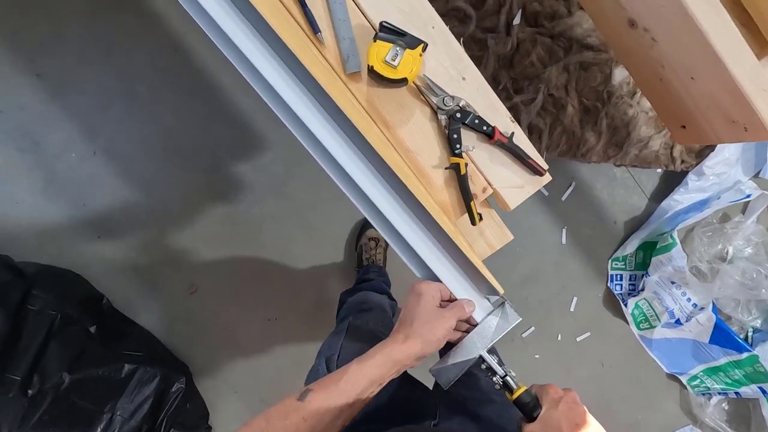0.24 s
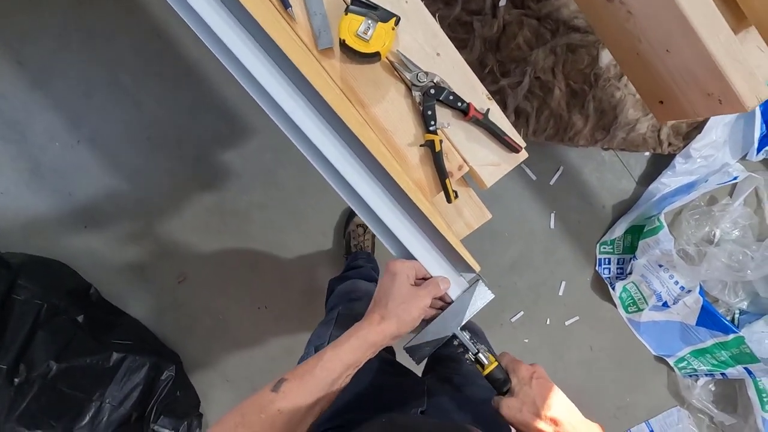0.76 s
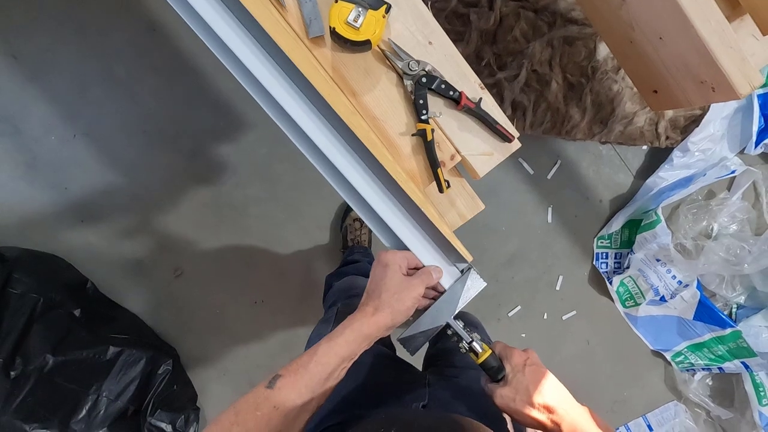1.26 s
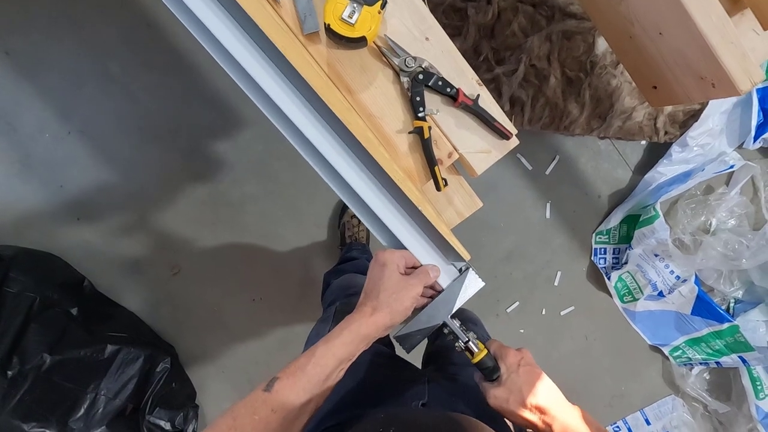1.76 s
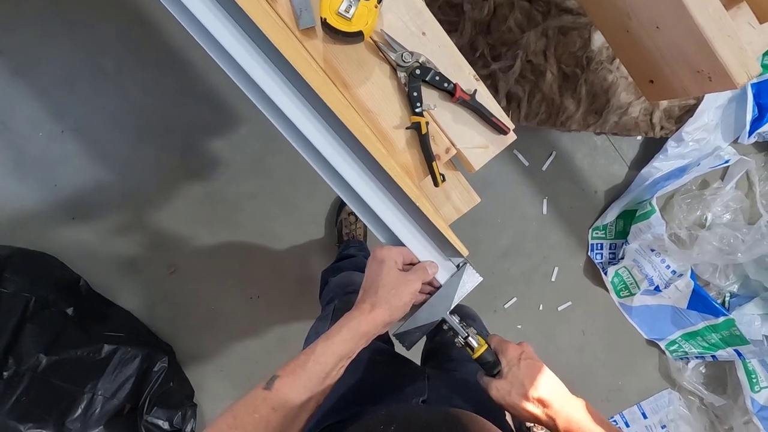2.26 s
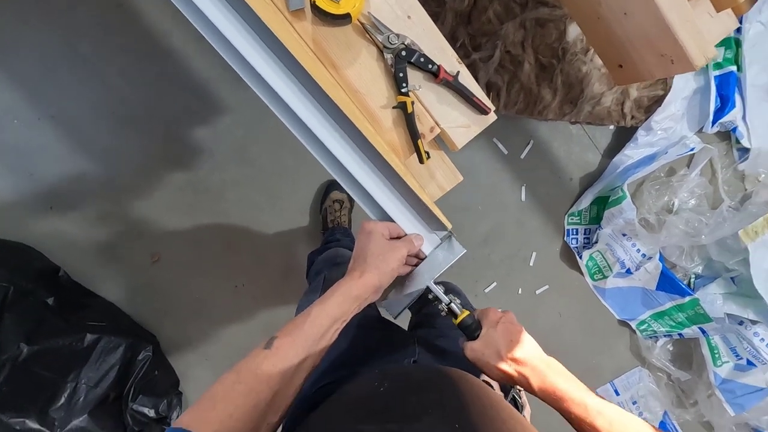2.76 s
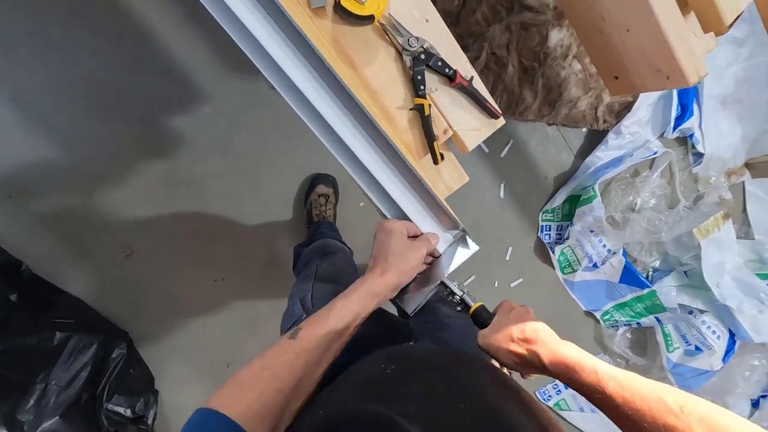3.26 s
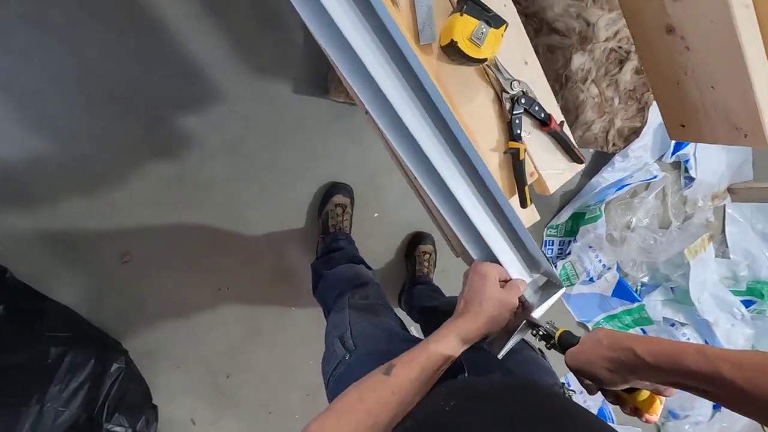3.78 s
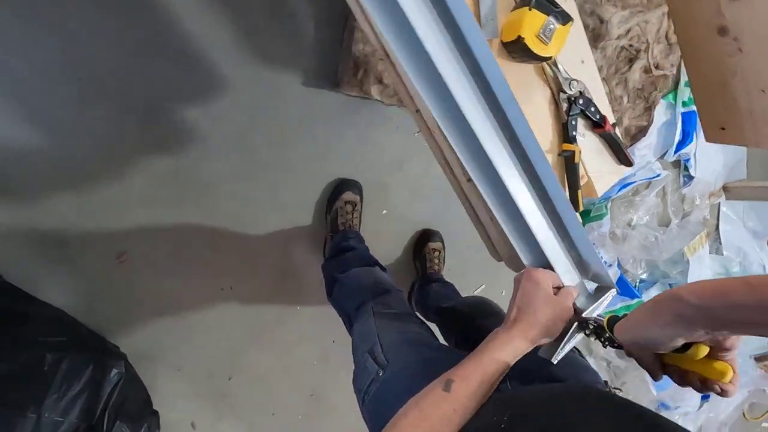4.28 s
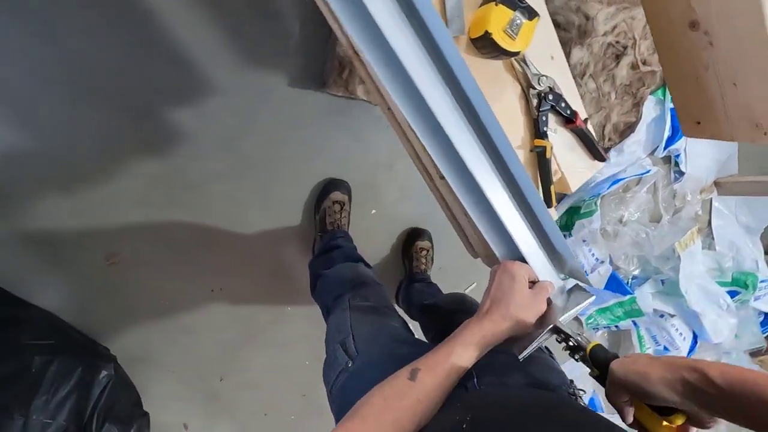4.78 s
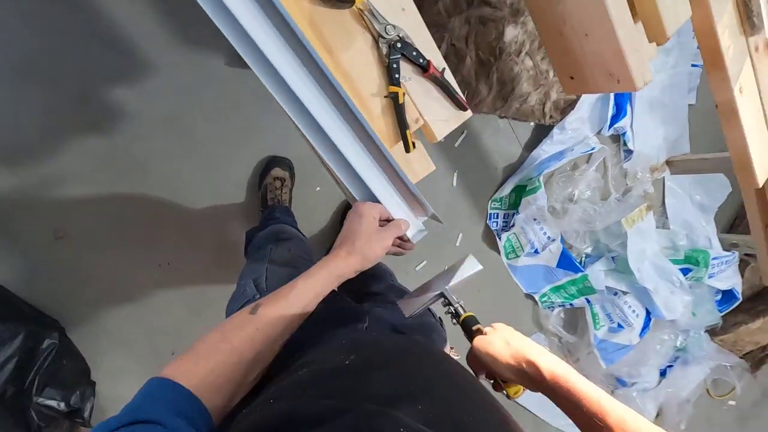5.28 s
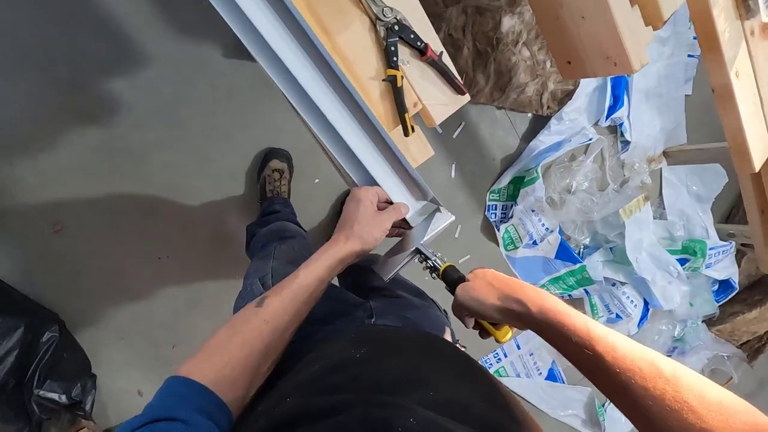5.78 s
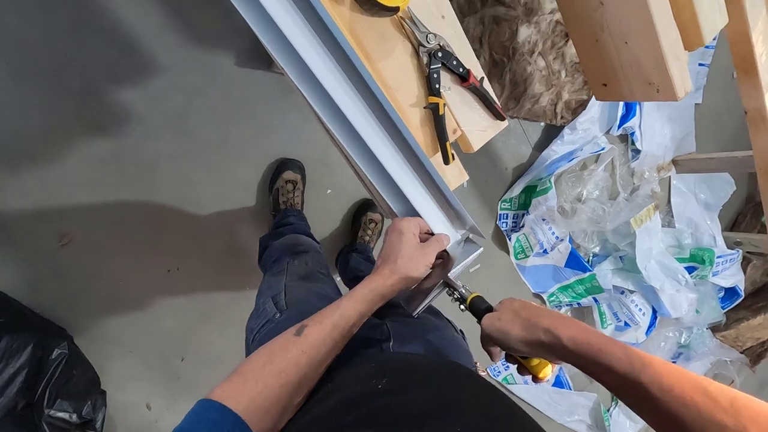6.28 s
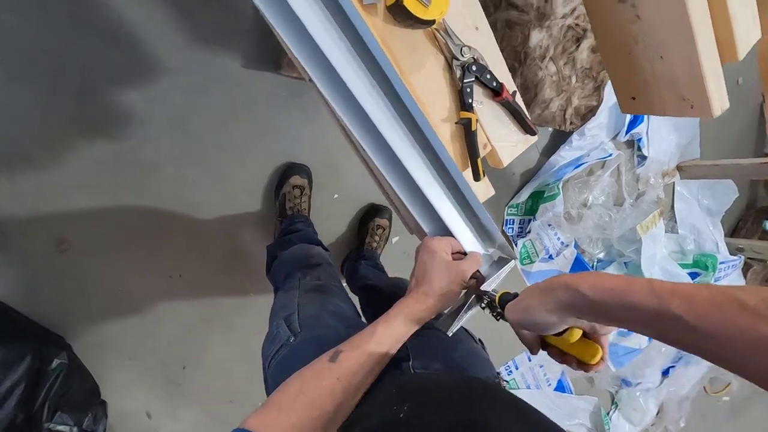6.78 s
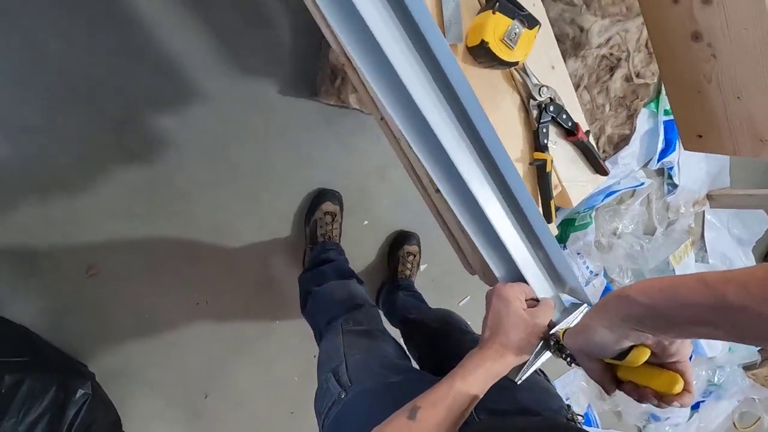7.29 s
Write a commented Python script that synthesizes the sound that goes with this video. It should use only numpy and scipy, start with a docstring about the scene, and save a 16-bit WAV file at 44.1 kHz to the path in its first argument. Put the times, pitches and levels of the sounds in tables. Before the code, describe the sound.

Close, head-worn pickup of a hand tool working a sheet-metal tab: small dry clicks and brief creaks at first, sparse faint ticks, then a sharper tick and creaking, two strong bright snaps, a pause, and one big resonant snap followed by clattering metal. Clothes and hands rustle softly beneath; the workshop adds a short, dull echo.

```python
"""Jaws of a hand seamer tick, knock and snap as they bend the tab of a long, thin sheet-metal trim.
Each blow is filtered noise plus many ringing modes of the sheet; single notes stand out as decaying tones.
Spans of dense random clicks drive the modes: scrapes, creaks and rough rattle between the late blows.
Low thumps and faint high ticks are short bursts; an echo follows the metal; hands and clothes rustle
as flickering noise over a quiet room. A head-worn microphone shapes the bass and notches the treble."""
import sys
import numpy as np
from scipy import signal
from scipy.fft import rfft, irfft
from scipy.io import wavfile
from scipy.ndimage import uniform_filter1d

SR = 44100
rng = np.random.default_rng(int(sys.argv[2]) if len(sys.argv) > 2 else 0)


def pcm_store(signal):
    """Save signal as 16-bit PCM."""
    levels = np.round(np.clip(np.atleast_2d(signal), -1, 1) * 32767)
    wavfile.write(sys.argv[1], SR, levels.astype(np.int16).T)


N = 332501  # length in samples

# Ticks, knocks and snaps of the jaws, before the echo and the microphone.
# Each row: start in seconds, peak of the crack in dB, pitch of the crack in Hz,
# time in seconds for the crack's push to fall 60 dB, then, in dB against the crack, the sheet's ring,
# the base in seconds for how fast the grip damps that ring, and, again in dB against the crack,
# the low ring and the brightness (level of the ping).
BLOWS = [(0.0044, -30.5, 1506, 0.0336, -14.5, 1, -41.5, -25.5),
         (0.3643, -33, 1730, 0.079, -4, 0.187, 2.5, -12.5),
         (0.4978, -24.5, 3200, 0.0364, -30.5, 0.234, -21.5, -30),
         (0.5071, -23, 1760, 0.0166, -12.5, 0.336, -22, -41.5),
         (0.5455, -23.5, 2120, 0.0234, -0.5, 0.094, -30.5, -29),
         (0.7987, -30.5, 2150, 0.0078, 1, 0.1345, -10, -21.5),
         (0.805, -28, 2900, 0.0097, -16.5, 0.17, -40.5, -21.5),
         (0.83, -31, 1674, 0.0137, -17, 0.536, -22.5, -8.5), (1.3013, -55, 3280, 0.038, -1.5, 1, -20, 2),
         (1.706, -43.5, 2090, 0.038, -10.5, 0.29, -18.5, -4.5),
         (1.7497, -42.5, 1840, 0.042, -3, 0.345, -26.5, -12.5),
         (1.7704, -38.5, 2530, 0.023, -13.5, 0.4, -31.5, -4.5),
         (1.9861, -44.5, 1680, 0.066, -11, 0.215, -27, -12),
         (2.137, -28, 3090, 0.0144, -12.5, 0.27, -21.5, -3.5),
         (2.2376, -32.5, 2930, 0.0224, -5, 0.093, -20.5, -31),
         (2.248, -29, 2893, 0.0255, -14.5, 0.174, -33, -28),
         (2.7903, -46, 1370, .026, -6.5, 0.257, -20, -30),
         (2.816, -34, 1850, 0.063, -29.5, 0.34, -25.5, -31.5),
         (2.9056, -33.5, 1650, 0.051, -2.5, 0.136, -18, -35.5),
         (2.97, -29.5, 2685, 0.042, -15, 0.336, -48, -20),
         (3.6966, -42.5, 1340, 0.055, -10.5, 0.86, -13, -19),
         (3.7876, -34.5, 1520, 0.103, -4, 0.264, 1.5, -13),
         (3.8862, -19, 3265, 0.0089, -19.5, 0.362, -15, -8.5),
         (3.918, -42, 1900, 0.031, 6, .23, -16.5, -24), (4.0386, -41, 2320, 0.0215, -8, 0.22, -21.5, -4.5),
         (4.15, -32.5, 2956, 0.149, -8, 0.382, -33.5, -17.5),
         (4.251, -44, 2820, 0.028, -9.5, .3, -31.5, -6), (4.4157, -34, 2123, 0.088, -20, 0.62, -35, -5),
         (4.4529, -35.5, 2380, 0.027, -10.5, .19, -36.5, -7),
         (4.5778, -38, 1830, 0.038, -10.5, 0.28, -10, -11),
         (4.6552, -12, 2134, 0.0168, -19.5, 0.58, -22.5, -4.5),
         (4.6602, -8, 2444, 0.038, -15, 0.133, -6, -11), (4.6868, -18.5, 1750, 0.018, -38.5, 1, -51, -4),
         (4.7332, -25.5, 1850, 0.062, -23, 0.52, -16, -18.5),
         (4.9287, -4.5, 2500, 0.028, -17.5, 0.379, -30.5, -19),
         (5.0996, -36, 2250, 0.116, -13, 1, -27.5, -10),
         (5.6285, -42.5, 2560, 0.031, -17.5, 0.21, -39, -12.5),
         (5.8875, -4, 2000, 0.071, -9, 0.492, -30.5, -18), (5.8963, -13.5, 1450, 0.0092, -17, 1, -9.5, -24),
         (6.0104, -20, 1315, 0.012, -6.5, 0.238, -6, -28.5),
         (6.1184, -21.5, 2590, 0.055, -1, 0.155, -9.5, -42),
         (6.1558, -23, 1930, 0.132, -6.5, 0.58, -17.5, -14),
         (6.2626, -17, 2300, 0.0384, -4.5, 0.117, -3, -53.5),
         (6.3101, -29.5, 1304, 0.062, -2.5, 0.124, -5, -36), (6.3817, -38.5, 1490, 0.04, 6, 0.073, -27, -5),
         (6.4696, -29, 2875, 0.13, -8.5, 0.44, -11.5, -4.5),
         (6.6452, -43, 1610, 0.0294, -3.5, 0.315, -19.5, 6),
         (6.8025, -39.5, 1550, 0.135, -15, 0.24, -32, -34.5)]
PING_HZ, PING_SPREAD = 4220, 0.0547  # bright ring of the jaws; random share by which ping and tick pitch vary
TICK_HZ, TICK_DB = 10800, -16.5  # middle pitch of the very high tick; its level against the ping
BOOM_DB = -15  # lowest modes of the trim against the low ring
SIZZLE_HZ, SIZZLE_SHARE = 6000, 0.493  # a brighter blow lifts modes above this pitch, dB per dB


def hits(t, modes, mode_hz, mode_db):
    """Each blow: a pitched crack, a higher ping and tick, then the sheet rings, damped by the grip."""
    out = np.zeros(N)
    boom = mode_hz < 400
    hum = (mode_hz > 400) & (mode_hz < 700)
    strong = np.arange(len(mode_hz)) < len(STRONG_MODES)
    for start, db, hz, crack_t60, ring_db, ring_t60, low_db, bright_db in BLOWS:
        noise = rng.standard_normal((3, len(t)))
        chance = rng.standard_normal((2, len(mode_hz)))
        ping_hz, tick_hz = np.array([PING_HZ, TICK_HZ]) * (1 + PING_SPREAD * rng.standard_normal(2))

        crack = burst(noise[0], t, crack_t60, hz, 0.5 * hz)
        ping = burst(noise[1], t, crack_t60, ping_hz, 0.4 * ping_hz)
        ping_tail = burst(noise[1], t, 0.42 * ring_t60, ping_hz, 0.8 * ping_hz)
        bright = ping + undb(-13) * ping_tail + undb(TICK_DB) * tick(noise[2], t, tick_hz)

        # another spot is struck each time: new strengths and phases, most near the crack's own pitch
        octaves_away = np.abs(np.log2(mode_hz / hz))
        share_db = ring_db + np.where(strong, 1.5, 3.0) * chance[0]
        share_db = share_db - np.where(strong, 3.0, 6.0) * octaves_away
        share_db = share_db + SIZZLE_SHARE * (bright_db + 14.5) * (mode_hz > SIZZLE_HZ)
        # the lowest modes follow how the trim is held, not the spot struck
        share_db = np.where(hum, low_db - mode_db[hum].max(), share_db)
        share_db = np.where(boom, low_db + BOOM_DB - mode_db[boom].max(), share_db)
        ring = strike(modes, mode_db + share_db, chance[1]) * fade(t, 0.9 * ring_t60)

        add(out, undb(db) * (crack + ring + undb(bright_db) * bright), start)
    return out


# Strong modes (natural tones) of the sheet, before a blow or a span of clicks weights and damps them.
# Each row: pitch in Hz, level in dB, time in seconds to fall 60 dB when left free.
STRONG_MODES = [(250, -26, .5), (286, -18, .6), (516, -9, .9), (531, -17, .5), (640, -19, .3),
                (860, -10, .42), (917, -10, .35), (1039, -16, .47), (1303, -6, .33), (1443, -18, .6),
                (1604, -16, .47), (1755, -14, .4), (1850, -9, .55), (1897, -12, .4), (1993, -11, .4),
                (2113, -14, .4), (2168, -15, .49), (2381, -10, .37), (2447, -11, .5), (2659, -14, .5),
                (2859, -11, .45), (2948, -9, .44), (3074, -19, .3), (3182, -18, .5), (3381, -8, .4),
                (3596, -21, .6), (3755, -23, .6), (4151, -24, .42), (4285, -21, .42)]
# Outline of the many lesser modes, before all of them are lowered together.
# Each row: pitch in Hz, level in dB.
LESSER_MODES = [(600, -3.5), (1100, -15), (1500, -2.5), (2000, -3), (2900, -3.5), (3550, -9.5), (3800, -11),
                (5500, -13), (7800, -17.5), (13000, -23)]


def sheet_modes(t):
    """The strong modes of the sheet, then a crowd of lesser ones: rings, pitches in Hz, levels in dB."""
    hz, db, t60 = np.transpose(STRONG_MODES)
    chance = rng.random((480, 2))
    crowd_hz = 700 + 12500 * chance[:, 0] ** 2  # crowded towards the low end
    crowd_t60 = 2.28 + 0.336 * chance[:, 1]
    outline_hz, outline_db = np.transpose(LESSER_MODES)
    crowd_db = np.interp(np.log(crowd_hz), np.log(outline_hz), outline_db) - 17
    hz = np.append(hz, crowd_hz)
    rings = ringing(hz, np.append(t60, crowd_t60), t)
    return rings.astype(np.complex64), hz, np.append(db, crowd_db)


def ringing(hz, t60, t):
    """Free rings, one row a mode; low modes build up late, as bending waves crawl along the trim."""
    hz, t60 = hz[:, None], t60[:, None]
    build_up = 1 - np.exp(-t * hz / 14)
    return build_up * fade(t, t60) * np.exp(2j * np.pi * hz * t)


def strike(modes, db, phase):
    """All modes sounding together, each with its level and starting phase (radians are twice phase)."""
    weights = undb(db) * np.exp(2j * phase)
    return np.imag(weights.astype(np.complex64) @ modes)


def burst(noise, t, t60, hz, width_hz):
    """A first touch, then a short rattle of contact, through a steep resonance; peak 1."""
    push = noise * fade(t, t60) + 6.64 * (t == 0)
    x = band(band(push, hz, width_hz), hz, width_hz)
    return x / np.abs(x).max()


def tick(noise, t, hz):
    """A very high, short tick: a burst whose push falls 60 dB in about 0.03 s; peak 1."""
    return burst(noise, t, 0.0297, hz, 0.18 * hz)


# Single notes that stand out of a blow or a span of clicks, rung by the jaws or the bent tab.
# Each row: start in seconds, level in dB before swell and rattle, pitch in Hz, seconds to fall 60 dB.
STANDOUT_NOTES = [(.37, -49, 3423, 0.44), (.37, -51.5, 2830, .4), (.528, -41, 5040, 0.059),
                  (.55, -33.5, 1396, 0.142), (3.92, -31.5, 1967, 0.087), (4.25, -51.5, 5297, .085),
                  (4.655, -9.5, 2018, 0.0165), (4.686, -16.5, 4535, 0.013), (4.866, -33.5, 1334, 0.253),
                  (4.89, -56.5, 4300, 0.22), (4.89, -57, 7230, 0.23), (4.925, -24.5, 3340, 0.202),
                  (4.95, -51.5, 5300, 0.177), (5.889, -19.5, 1300, 0.452), (5.889, -28.5, 904.3, 0.303),
                  (5.96, -39, 285.9, 0.597), (6.01, -27.5, 4315, 0.032), (6.12, -48.5, 7866, 0.14),
                  (6.12, -30.5, 3734, .07), (6.265, -27, 2589, 0.051), (6.265, -35, 855.3, 0.172),
                  (6.29, -42.5, 290.3, 0.33), (6.471, -27, 1430, 0.048), (6.47, -39, 4670, 0.109),
                  (6.47, -45, 2990, 0.126), (6.645, -49.5, 5140, 0.093)]
NOTE_RISE_CYCLES, NOTE_RATTLE_DB = 5.2, -8.5  # a note swells over some cycles; contact noise roughens it


def notes(t):
    """Each note is one mode ringing freely, with a little rattle at its pitch."""
    out = np.zeros(N)
    for start, db, hz, t60 in STANDOUT_NOTES:
        swell = 1 - np.exp(-t * hz / NOTE_RISE_CYCLES)
        clear = swell * fade(t, t60) * np.sin(2 * np.pi * hz * t)
        rattle = burst(rng.standard_normal(len(t)), t, t60, hz, 0.12 * hz)
        add(out, undb(db) * (clear + undb(NOTE_RATTLE_DB) * rattle), start)
    return out


# Spans of dense clicks: scrapes, and rough rattle between the late blows.
# Each row: start in seconds, end in seconds, average level at the start in dB, the same at the end in dB,
# centre pitch in Hz.
CLICK_SPANS = [(0.373, 0.469, -40.5, -46.5, 1715), (0.486, 0.599, -43.5, -48, 2250),
               (0.769, 0.848, -49.5, -61.5, 2460), (2.756, 2.843, -50.5, -55.5, 1393),
               (3.796, 3.989, -48.5, -48, 1694), (4.593, 4.656, -61, -25, 2080),
               (4.854, 4.886, -40, -23.5, 1610), (4.887, 4.933, -27.5, -19, 2190),
               (5.949, 6.103, -26, -45, 2303), (6.143, 6.254, -52, -48.5, 2200),
               (6.264, 6.358, -47, -60, 2150)]
CLICKS_PER_S = 1600  # average number of tiny clicks a second


def scrapes_and_rattle(t, modes, mode_hz, mode_db):
    """Dense, uneven clicks drive the gripped sheet, whose modes ring briefly after each one."""
    out = np.zeros(N)
    for start, end, start_db, end_db, hz in CLICK_SPANS:
        count = int((end - start) * SR)
        clicking = rng.random(count) < CLICKS_PER_S / SR
        clicks = clicking * rng.standard_normal(count) * undb(np.linspace(start_db, end_db, count))

        chance = rng.standard_normal((2, len(mode_hz)))
        octaves_away = np.abs(np.log2(mode_hz / hz))
        share_db = mode_db + 2.42 * chance[0] - np.where(mode_hz < hz, 16, 8) * octaves_away
        body = strike(modes, share_db, chance[1]) * fade(t, 0.0632)  # the grip damps it quickly
        body_level = np.sqrt(np.sum(body ** 2) * CLICKS_PER_S / SR)
        add(out, signal.fftconvolve(clicks, body) / body_level, start)
    return out


# Dull low thumps, many under a blow.
# Each row: start in seconds, peak in dB, pitch in Hz, seconds for the push to fall 60 dB.
LOW_THUMPS = [(0.497, -39, 297, 0.091), (0.821, -44, 273.4, 0.195), (2.252, -50.5, 293, 0.374),
              (3.507, -57, 269, 0.142), (4.662, -25.5, 567.8, 0.0804), (4.688, -42.5, 272, 0.17),
              (4.926, -40, 292, 0.143), (5.097, -47.5, 177, 0.062), (5.748, -45.5, 297, 0.064),
              (6.647, -52, 329, 0.13)]


def thumps(t):
    """Each thump is a burst of contact noise through a low resonance."""
    out = np.zeros(N)
    for start, db, hz, t60 in LOW_THUMPS:
        add(out, undb(db) * burst(rng.standard_normal(len(t)), t, t60, hz, 0.44 * hz), start)
    return out


# Faint, very high ticks heard without a blow.
# Each row: start in seconds, peak in dB, pitch in Hz.
LONE_TICKS = [(0.3022, -54.5, 10140), (0.399, -59, 10200), (0.9463, -60, 10100), (1.1365, -65, 10250),
              (1.4426, -60.5, 10200), (3.042, -54.5, 7430), (3.0693, -52.5, 7570), (3.2114, -51, 8410),
              (4.6344, -53.5, 10500), (5.5199, -55, 10100), (6.1655, -49, 10800)]


def lone_ticks(t):
    """Each tick is a short burst of noise through a very high resonance."""
    out = np.zeros(N)
    for start, db, hz in LONE_TICKS:
        add(out, undb(db) * tick(rng.standard_normal(len(t)), t, hz), start)
    return out


# Rustle of hands, tool and clothes together with the quiet room; levels glide from row to row.
# Each row: time in seconds, middle level in dB, bass level in dB, treble level in dB.
RUSTLE_LEVELS = [(0, -47.5, -53, -50), (.14, -61, -63.5, -63.5), (.55, -55.5, -53.5, -62.5),
                 (1.05, -63.5, -63.5, -70.5), (2.05, -62, -65.5, -69.5), (2.3, -60, -59.5, -67),
                 (2.52, -65.5, -64, -72), (2.92, -58.5, -65.5, -68.5), (3.25, -62, -64, -66.5),
                 (4.01, -56, -57.5, -63), (4.4, -57.5, -65.5, -58), (4.75, -62, -48, -69),
                 (5.28, -63.5, -66.5, -67.5), (5.47, -58, -63, -66.5), (5.8, -55, -57, -64.5),
                 (6.42, -51, -50.5, -65), (6.8, -62, -65.5, -67.5), (7.54, -63.5, -64, -68)]
# Colour of the rustle, before each range is set to its own level.
# Each row: pitch in Hz, relative strength of the noise there in dB.
RUSTLE_SPECTRUM = [(20, -17.5), (100, -9.5), (170, -6.5), (550, 0), (950, -5.5), (1300, -3.5), (2600, -5.5),
                   (7000, -28.5), (10000, -26), (14000, -13)]
AIR_DB, AIR_SWING = -76, 1.1  # top range when the treble stands at -66.5 dB; its dB per dB of treble


def rustle():
    """Soft friction noise in four ranges; each flickers, and fine grains roughen it."""
    s, middle_db, bass_db, treble_db = np.transpose(RUSTLE_LEVELS)
    air_db = AIR_DB + AIR_SWING * (treble_db + 66.5)
    levels_db = (bass_db, middle_db, treble_db, air_db)
    flickers_db = (3.38, 1.3, 1.38, 2.5)
    edges_hz = (10, 800, 3800, 7800, 15000)
    out = 0
    for db, flicker_db, lo_hz, hi_hz in zip(levels_db, flickers_db, edges_hz, edges_hz[1:]):
        grains = undb(2.0 * rng.exponential(size=N) + flicker_db * walk(30))
        noise = colour(rng.standard_normal(N) * grains, RUSTLE_SPECTRUM)
        range_filter = signal.butter(3, (lo_hz, hi_hz), "bandpass", fs=SR, output="sos")
        noise = signal.sosfilt(range_filter, noise)
        out = out + unit(noise) * undb(np.interp(np.arange(N) / SR, s, db))
    return out


ROOM_T60_S, ROOM_DB = 0.463, -15  # seconds for the echo to fall 60 dB; its overall gain


def room(x):
    """Diffuse echo of the workshop, duller than the direct sound."""
    t = np.arange(SR // 2) / SR
    tail = colour(rng.standard_normal(len(t)), [(100, 3.5), (3000, -2), (12000, -9)])  # (Hz, dB)
    tail = tail * fade(t, ROOM_T60_S) * (t > 0.008)  # nothing returns in the first 8 ms
    return undb(ROOM_DB) * signal.fftconvolve(x, tail / np.sqrt(np.sum(tail ** 2)))[:N]


def undb(db):
    """Gain of a level in dB."""
    return 10 ** (np.asarray(db) / 20)


def unit(x):
    """Scaled to an average (rms) level of 1."""
    return x / np.sqrt(np.mean(x ** 2))


def fade(t, t60):
    """Decay of 60 dB in t60 seconds, never shorter than 4 ms."""
    return np.exp(-np.log(1000) * t / np.maximum(t60, 0.004))


def colour(x, points):
    """Shapes x by a spectrum drawn through (Hz, dB) points."""
    hz, db = np.transpose(points)
    f = np.maximum(np.arange(len(x) // 2 + 1) * SR / len(x), 1)
    gain = undb(np.interp(np.log(f), np.log(hz), db))
    return irfft(rfft(x) * gain, len(x))


def band(x, hz, width_hz):
    """Two-pole resonance."""
    return signal.lfilter(*signal.iirpeak(hz, hz / width_hz, SR), x)


def walk(rate):
    """Random levels, rate of them a second, joined by smooth slopes; spread a little under 1."""
    k = int(SR / rate)
    steps = np.repeat(rng.standard_normal(N // k + 1), k)
    return uniform_filter1d(steps, k)[:N]


def add(out, x, s):
    """Mixes x into out from time s in seconds."""
    i = max(int(s * SR), 0)
    out[i:i + len(x)] += x[:len(out) - i]


def scene():
    """Metal work with its echo, over the rustle."""
    t = np.arange(SR // 2) / SR  # each blow, note or tick lasts at most half a second
    sheet = sheet_modes(t)
    work = hits(t, *sheet) + scrapes_and_rattle(t, *sheet) + notes(t) + thumps(t) + lone_ticks(t)
    return (work + room(work) + rustle())[None]


# Response of the microphone.
# Each row: pitch in Hz, gain in dB.
MIC_RESPONSE = [(20, -2.5), (105, -10), (150, 5), (7800, -2), (8700, -9.5), (9080, -19), (9450, -5),
                (10300, 0), (11200, -0.5), (12200, -19), (13200, -13), (14200, -40.5)]
TOP_HZ = 13900  # the steep top cut begins here


def record(dry):
    """The bass dips around 100 Hz, lifts at 150 Hz, and a band of treble is notched; the top is cut."""
    top_cut = signal.ellip(8, 0.2, 70, TOP_HZ, fs=SR, output="sos")
    return signal.sosfilt(top_cut, colour(dry[0], MIC_RESPONSE))[None]


dry = scene()
out = record(dry)
pcm_store(out)
```